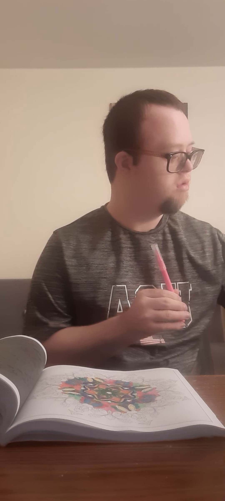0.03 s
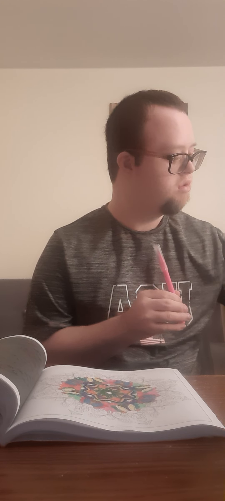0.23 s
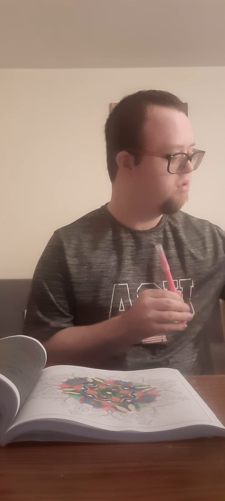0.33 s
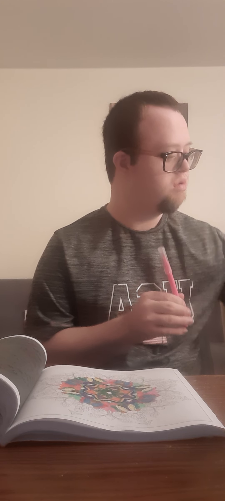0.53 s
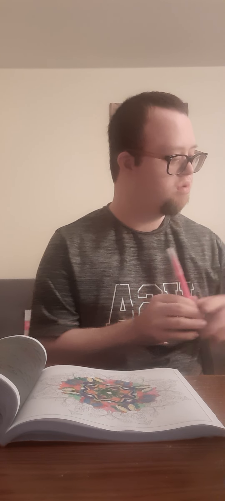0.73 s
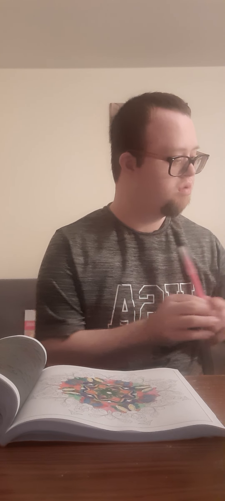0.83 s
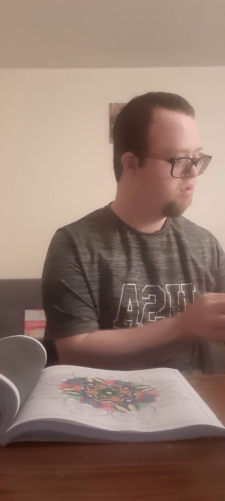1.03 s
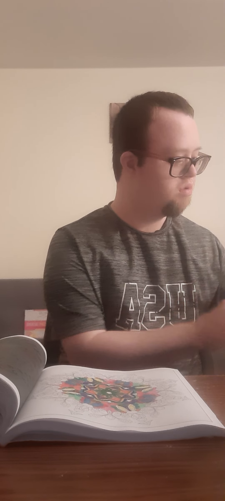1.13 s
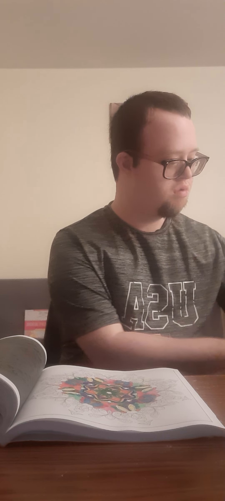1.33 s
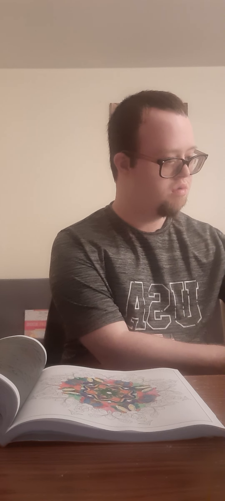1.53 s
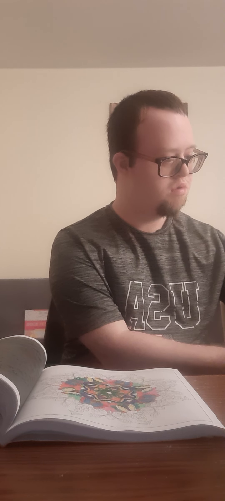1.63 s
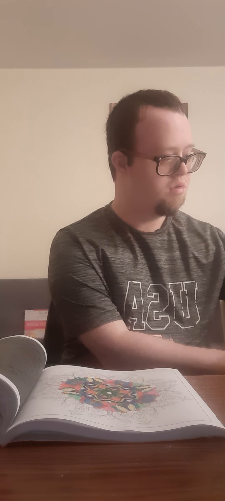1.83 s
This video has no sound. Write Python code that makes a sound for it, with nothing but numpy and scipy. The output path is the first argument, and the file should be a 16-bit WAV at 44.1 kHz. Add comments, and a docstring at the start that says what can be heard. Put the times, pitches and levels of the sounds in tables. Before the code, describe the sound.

Plastic marker knocks on a wooden tabletop: one loud double click, later a quieter rattling placement

```python
"""Over low room noise with a faint hum and a treble hiss that swells and fades, a plastic marker lands on a
wooden table: a sharp double click (noise bursts and damped modes), a boom of the tabletop (a modal sum) and
early echoes, and the room rings briefly. About a second later a sleeve brushes and a forearm shifts (swelling
friction noise), then another marker is set down, slides for a moment and rocks to rest in softer taps."""
import sys
import numpy as np
from scipy import signal
from scipy.fft import rfft, irfft, next_fast_len
from scipy.io import wavfile

SR = 44100
rng = np.random.default_rng(int(sys.argv[2]) if len(sys.argv) > 2 else 0)


def dump_mix(stems):
    """Bounce the given channels to the path in sys.argv[1] as a 16-bit WAV at rate SR."""
    frames = np.atleast_2d(stems).T  # one column per channel
    limited = np.clip(frames, -1, 1)  # hard clip at full scale
    pcm = np.round(limited * 32767).astype(np.int16)
    wavfile.write(sys.argv[1], SR, pcm)


N = 83790  # length in samples
SIDES = np.array([[.5], [-.5]])  # shares a left-minus-right difference between the two channels


def amp(db):
    """Logarithmic level law: 20 dB is a factor of ten in amplitude."""
    return 10 ** (np.asarray(db) / 20)


def along(points, hz):
    """Logarithmic frequency scale: (f/Hz, value) points are interpolated linearly in log frequency."""
    f, value = np.transpose(points)
    return np.interp(np.log(hz + 1), np.log(f + 1), value)


def filtered(x, response):
    """Linear filtering: the spectrum is multiplied by a response of frequency."""
    size = next_fast_len(x.shape[-1] + 8192)
    hz = np.fft.rfftfreq(size, 1 / SR)
    return irfft(rfft(x, size) * response(hz), size)[..., :x.shape[-1]]


def noise(spectrum, size=N):
    """Partial coherence: independent mid and side noises make a coloured stereo pair of rms 1."""
    # coherence of left and right: f/Hz, correlation
    coherence = [(50, .3), (150, .5), (300, 0.51), (600, 0.53), (2000, 0.017)]

    def mid_side_gains(hz):
        angle = np.arccos(np.clip(along(coherence, hz), -1, 1)) / 2
        return amp(along(spectrum, hz)) * [np.cos(angle), np.sin(angle)]

    mid, side = filtered(rng.standard_normal((2, size)), mid_side_gains)
    pair = np.array([mid + side, mid - side])
    return pair / pair.std()


def fade(t, rise, t60):
    """Exponential damping: after a smooth rise the amplitude falls 60 dB in each t60."""
    return (1 - np.exp(-t / rise)) * np.exp(-np.log(1000) * t / t60)


def add(track, s, sound):
    """Superposition: a sound is summed into the track at time s."""
    i = min(round(s * SR), N - 1)
    track[:, i:i + sound.shape[1]] += sound[:, :N - i]


def room(x):
    """Diffuse reverberation: convolution with fresh noise whose decay rate depends on frequency."""
    # reverberation time of the room: f/Hz, t60/s
    room_decay = [(80, .5), (300, 0.37), (700, 0.3), (1500, 0.57), (3000, 0.44), (6000, 0.44),
                  (12000, 0.32), (16000, 0.23)]
    wall_delay_s, build_up_s = .004, .003
    hz, t, bins = signal.stft(noise([(0, 0)], size=SR * 3 // 4), SR, nperseg=256)
    decay = np.exp(-np.log(1000) * t / along(room_decay, hz)[:, None])
    tail = signal.istft(bins * decay, SR, nperseg=256)[1]
    since_wall = np.maximum(np.arange(tail.shape[1]) / SR - wall_delay_s, 0)
    tail = tail * (1 - np.exp(-since_wall / build_up_s))
    unit_energy_tail = tail / np.linalg.norm(tail, axis=1, keepdims=True)
    return signal.fftconvolve(x, unit_energy_tail, axes=1)


def ringing(modes, t, rise):
    """Modal superposition: damped sines with levels new at each call and phases new in each channel."""
    total = 0
    for hz, db, t60 in modes:
        gain = amp(db + rng.normal(0, 2))
        total = total + gain * fade(t, rise, t60) * np.sin(2 * np.pi * (hz * t + rng.random((2, 1))))
    return total


def rubbing(strokes, colour):
    """Friction: broadband noise swells and fades with each movement, along two half-Gaussians."""
    t = np.arange(N) / SR
    envelope = 0
    for s, db, rise, fall in strokes:
        width = np.where(t < s, rise, fall)
        envelope = envelope + amp(db) * np.exp(-((t - s) / width) ** 2)
    return noise(colour) * envelope


def markers():
    """Impulsive excitation: a bright click rings the barrel, beside a duller clack with a thin ringing tail."""
    # hard clicks of a marker and an early echo: t/s, click level/dB, clack level/dB, left minus right/dB
    clicks = [(0.2273, -5.5, -15.5, -1.5), (.2292, -10, -13, 5.5), (.2485, -10, -19, 1.5),
              (.2503, -5.5, -11, -0.5), (.2662, -30, -32.5, 8), (0.4854, -36.5, -47, -3),
              (1.464, -46.5, -63.5, 3), (1.4796, -25, -39, 1), (1.483, -30.5, -42.5, 12),
              (1.494, -38.5, -29.5, -0.5), (1.4995, -38, -33.5, -19.5), (1.6022, -60, -28, 3),
              (1.6285, -40.5, -57, 12), (1.6848, -44, -34, 0), (1.856, -53, -40, 1.5),
              (1.8975, -36.5, -31, -4)]
    # modes of the barrel and cap: f/Hz, mean level/dB, t60/s
    barrel_modes = [(2250, -24, .025), (3293, -23, .025), (5030, -18.5, 0.026), (5560, -15.5, .035),
                    (5800, -18, .03), (6560, -18, .02), (11570, -26.5, .015), (12830, -23, .015)]
    # thin ringing tones after a knock: f/Hz, mean level/dB, t60/s
    thin_tones = [(1006, -22, .3), (1063, -27.5, .3), (1178, -26.5, .35), (1535, -28.5, .3),
                  (1637, -30, .4), (1874, -29, .35), (2193, -27, 0.48)]
    # noise spectrum of the plastic click: f/Hz, relative density/dB
    click_colour = [(300, -17), (1400, -4), (2100, -4.5), (2900, -4.5), (3900, -7.5), (5700, 1), (6800, 2),
                    (8200, -11.5), (9100, -27.5), (10500, -15.5), (12400, -6.5), (14800, -16),
                    (16000, -22.5)]
    # noise spectrum of the wooden clack: f/Hz, relative density/dB
    clack_colour = [(150, -2), (400, -3), (750, 1), (1100, -5.5), (1400, -8.5), (2000, -7), (3000, -15),
                    (4500, -15), (9000, -34), (16000, -41)]
    rise_s, click_t60_s, clack_t60_s = 0.00047, 0.014, .028
    click_room_db, clack_room_db = -6, -1.5

    out, t = np.zeros((2, N)), np.arange(SR // 3) / SR
    for s, click_db, clack_db, pan_db in clicks:
        crack = noise(click_colour, len(t)) * fade(t, rise_s, click_t60_s)
        click = amp(click_db) * (ringing(barrel_modes, t, rise_s) + crack)
        clack = amp(clack_db) * noise(clack_colour, len(t)) * fade(t, rise_s, clack_t60_s)
        ringing_tail = amp(clack_db) * ringing(thin_tones, t, rise_s)
        add(out, s, (click + clack + ringing_tail) * amp(pan_db * SIDES))
        add(out, s, room(amp(click_room_db) * click + amp(clack_room_db) * clack))
    return out


def tabletop():
    """Modal response of a plate: knocks and echoes share its modes, each with its own weight on deep ones."""
    # knocks on the tabletop and their early echoes: t/s, level/dB, rise/s, extra level of the deep modes/dB
    knocks = [(0.2282, -5, 0.005, -4), (0.2497, -18, 0.003, 3.5), (0.2666, -14.5, 0.0012, -1.5),
              (0.2901, -22.5, 0.0044, -3.5), (.485, -37.5, .003, 3.5), (1.372, -32.5, .004, 12),
              (1.463, -32.5, .004, 8), (1.5034, -18, 0.0086, 9), (1.6028, -17.5, 0.0025, -2),
              (1.6903, -21.5, 0.0055, -2.5), (1.772, -35.5, .004, -13)]
    # tabletop modes: f/Hz, level/dB, t60/s, phase lead of left over right/rad, left minus right/dB
    table_modes = [(60, -33.5, .7, -2, -5.5), (97, -18.5, .2, -3, -8), (166, -15, 0.064, -1, -5.5),
                   (209.4, -15.5, .2, 0.6, -3), (266, -14, 0.24, 0.1, -4.5), (298.3, -13, .3, -0.3, -6),
                   (315.1, 0, 0.1, 0, -8), (478, -18, 0.15, 2, -4), (739, -22.5, 0.13, 1.5, 0),
                   (809, -25.5, .3, 5, -2)]
    deep_below_hz, table_room_db = 170, -12.5

    out, t = np.zeros((2, N)), np.arange(SR // 2) / SR
    for s, level_db, rise, deep_db in knocks:
        boom = 0
        for hz, db, t60, lead, pan_db in table_modes:
            gain = amp(level_db + db + deep_db * (hz < deep_below_hz) + pan_db * SIDES)
            boom = boom + gain * fade(t, rise, t60) * np.sin(2 * np.pi * hz * t + lead * SIDES)
        add(out, s, boom)
        add(out, s, amp(table_room_db) * room(boom))
    return out


def slide():
    """Friction over rough grain: as the barrel is laid down, small random level changes roughen its scrape."""
    # slides on the wood: t/s at the height, level/dB, rise/s, fall/s
    slides = [(1.5, -33.5, 0.019, 0.0098)]
    # scrape spectrum: f/Hz, relative density/dB
    scrape_colour = [(300, 8.5), (750, 6), (1300, -27), (2200, -9.5), (4000, -6.5), (6300, -1), (7500, -3),
                     (9000, -21), (12400, -9), (16000, -25)]
    grain_db, grains_per_s, scrape_room_db = 0.5, 920, -5  # grain_db is a standard deviation
    grain_position = np.arange(N) * grains_per_s / SR
    grain = amp(grain_db * np.interp(grain_position, np.arange(N), rng.standard_normal(N)))
    scrape = rubbing(slides, scrape_colour) * grain
    return scrape + amp(scrape_room_db) * room(scrape)[:, :N]


def sleeve():
    """Friction of cloth: each stroke of the sleeve is a swell of coloured noise."""
    # sleeve strokes: t/s at the height, level/dB, rise/s, fall/s
    strokes = [(1.388, -61, 0.014, 0.032), (1.63, -52, 0.062, 0.077), (1.885, -48, 0.039, .05)]
    # cloth spectrum: f/Hz, relative density/dB
    cloth_colour = [(100, -3), (350, -1), (900, -4.5), (2000, -16), (4000, -18.5), (6500, -10.5),
                    (9000, -33.5), (12500, -17.5), (16000, -34)]
    return rubbing(strokes, cloth_colour)


def forearm():
    """Low-frequency friction: the forearm shifting on the table is a swell of rumbling noise."""
    # shifts of the forearm: t/s at the height, level/dB, rise/s, fall/s
    shifts = [(1.42, -47, 0.041, 0.22), (1.87, -40.5, 0.11, 0.24)]
    # rumble spectrum: f/Hz, relative density/dB
    rumble_colour = [(30, -17), (58, -4), (95, -4.5), (130, -9), (200, -11.5), (300, -5.5), (400, -17.5),
                     (700, -40), (2000, -80)]
    return rubbing(shifts, rumble_colour)


def background():
    """Amplitude-modulated noise: low room noise and a faint treble hiss, plus steady hum tones."""
    # low room noise spectrum: f/Hz, relative density/dB
    air_colour = [(25, -32), (60, -15), (100, -13), (145, -7.5), (190, -17), (245, -7), (315, -5),
                  (370, -12), (560, -15.5), (650, -24.5), (1070, -24), (1900, -39.5), (3000, -37.5),
                  (4200, -49), (16000, -69)]
    # low room noise over time: t/s, level/dB
    air_level = [(0, -46), (.55, -50.5), (.85, -54), (1.1, -55.5), (1.9, -49)]
    # treble hiss spectrum: f/Hz, relative density/dB
    hiss_colour = [(300, -13.5), (2500, -9), (4200, -14), (5300, -4.5), (6300, 0.5), (7600, -2.5),
                   (9200, -20), (12000, -9), (16000, -21.5)]
    # treble hiss over time: t/s, level/dB
    hiss_level = [(0, -69), (.65, -64), (1.3, -76), (1.9, -74)]
    # hum tones: f/Hz, level/dB
    hum_tones = [(149, -60.5), (249, -58), (321, -55.5)]
    t = np.arange(N) / SR
    air = noise(air_colour) * amp(np.interp(t, *np.transpose(air_level)))
    treble_hiss = noise(hiss_colour) * amp(np.interp(t, *np.transpose(hiss_level)))
    hum = sum(amp(db) * np.sin(2 * np.pi * (hz * t + rng.random())) for hz, db in hum_tones)
    return air + treble_hiss + hum


def scene():
    """Linear superposition of markers, table, arm and room."""
    return markers() + tabletop() + slide() + sleeve() + forearm() + background()


def record(dry):
    """Transduction: two differently coloured microphones, a low cut, hard clipping and a band limit."""
    # tilt of the microphone pair: f/Hz, left minus right/dB
    tilt = [(60, -1.5), (110, -3.5), (200, -0.5), (330, -.5), (700, 1), (1290, 4.5), (2380, 7), (3400, 6.5),
            (4400, -0.5), (5600, -8), (7000, 0.5), (8500, -0.5), (11000, 9), (15000, 2.5)]
    low_cut_hz, clip_top, top_hz = 56, .92, 15900
    x = filtered(dry, lambda hz: amp(along(tilt, hz) * SIDES))
    x = signal.sosfilt(signal.butter(6, low_cut_hz, "highpass", fs=SR, output="sos"), x)
    clipped = np.clip(x, -clip_top, clip_top)
    return filtered(clipped, lambda hz: 1 / np.sqrt(1 + (hz / top_hz) ** 160))


dry = scene()
out = record(dry)
dump_mix(out)
```